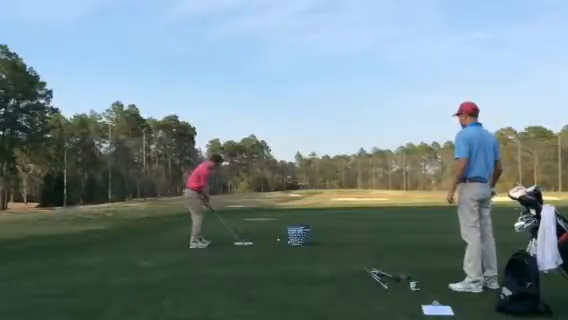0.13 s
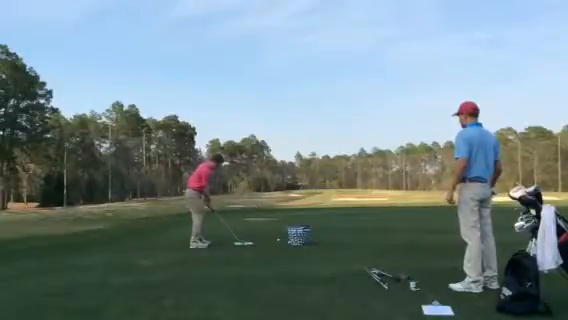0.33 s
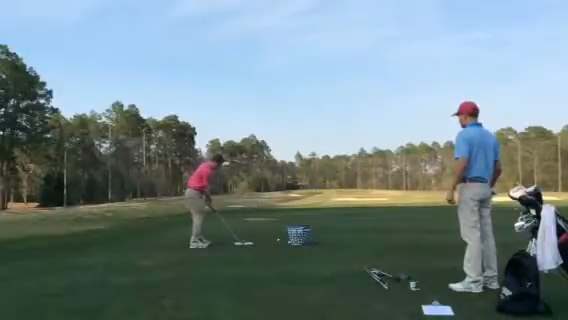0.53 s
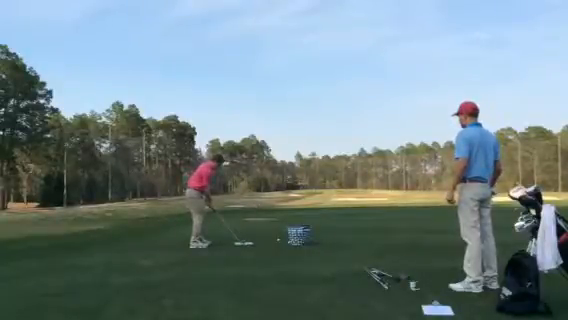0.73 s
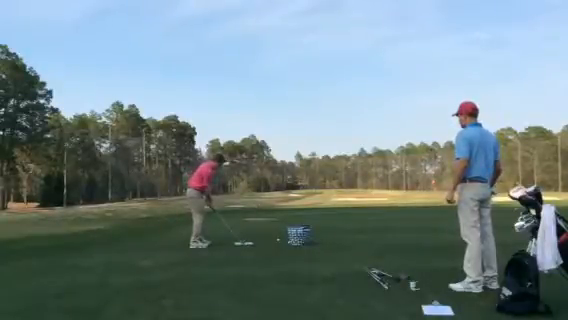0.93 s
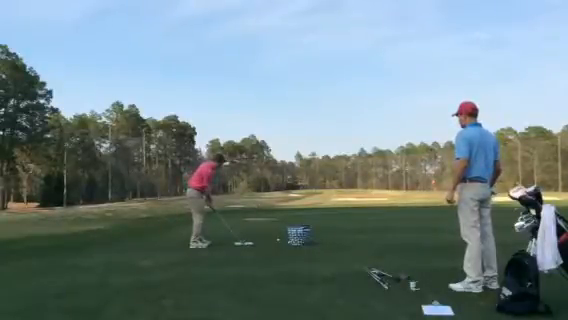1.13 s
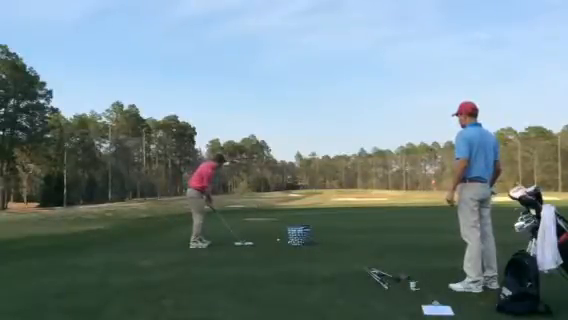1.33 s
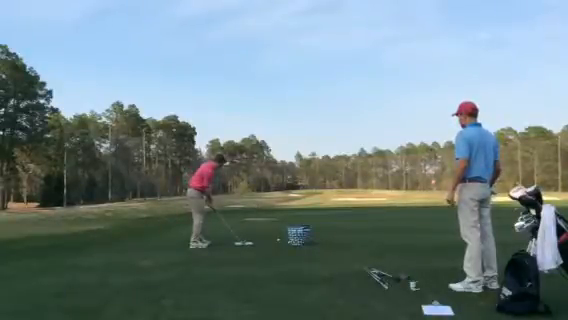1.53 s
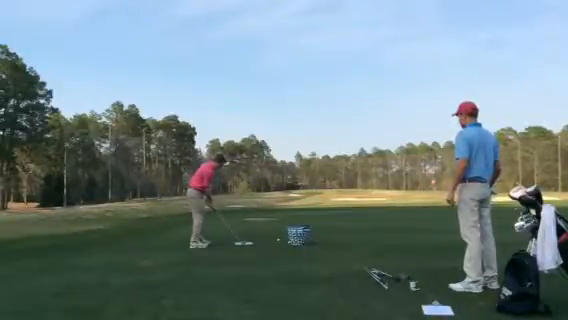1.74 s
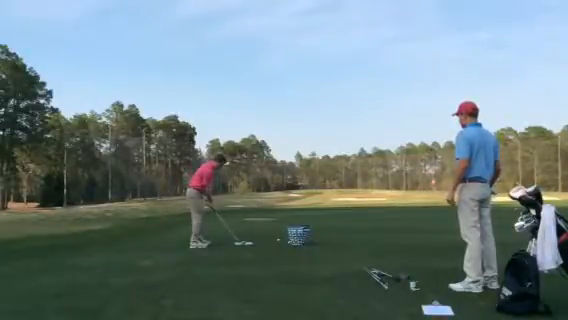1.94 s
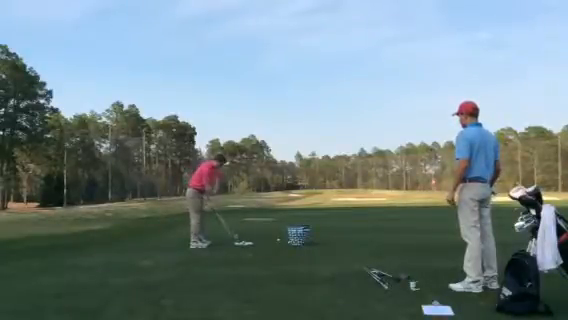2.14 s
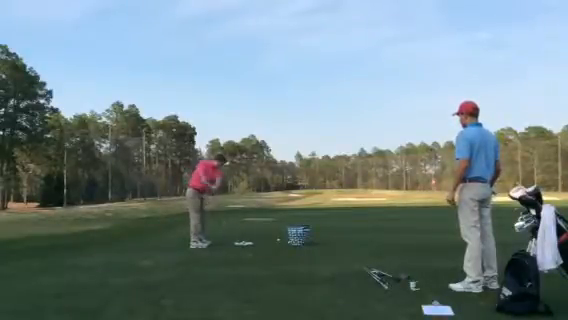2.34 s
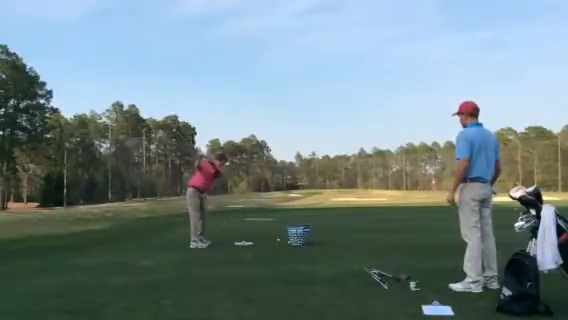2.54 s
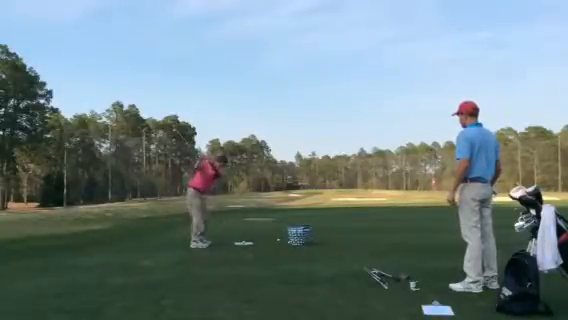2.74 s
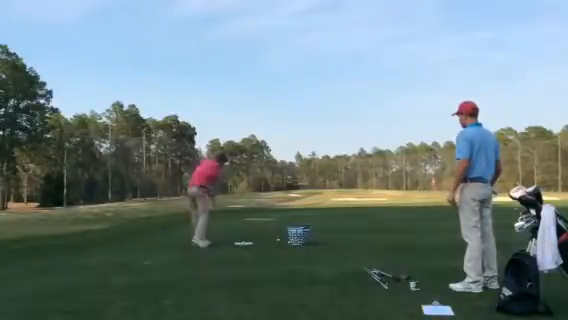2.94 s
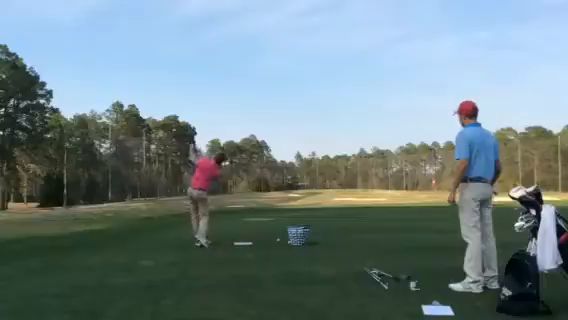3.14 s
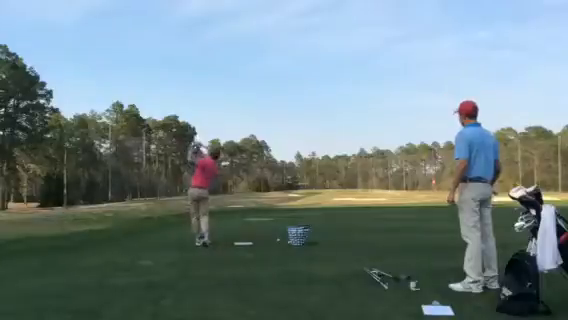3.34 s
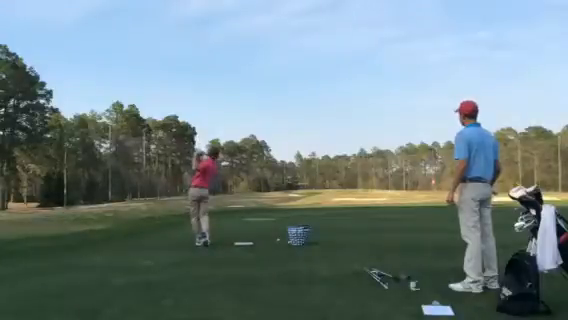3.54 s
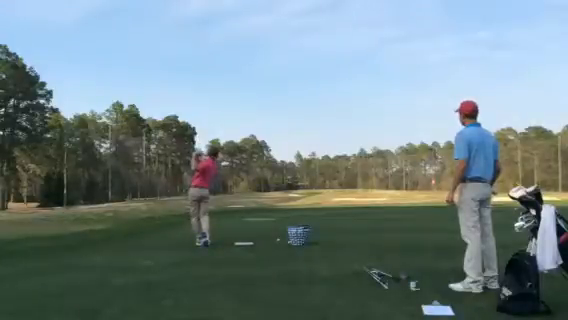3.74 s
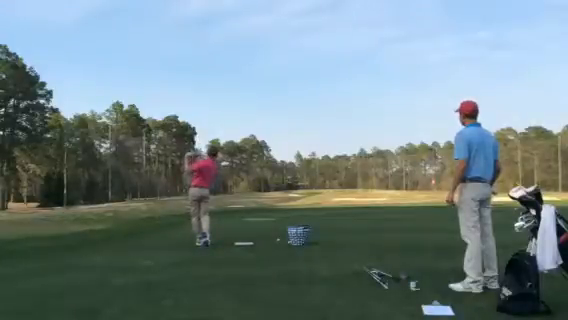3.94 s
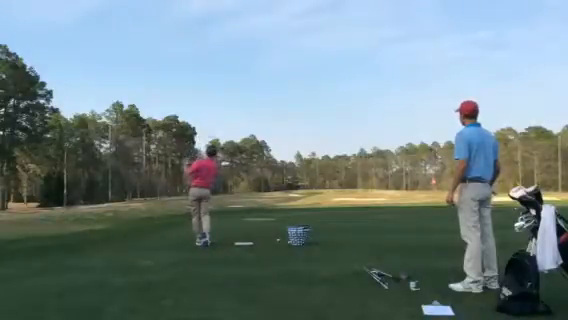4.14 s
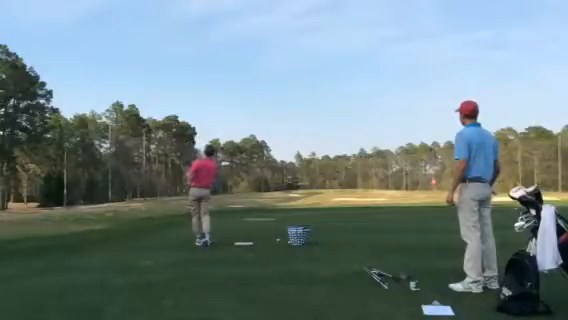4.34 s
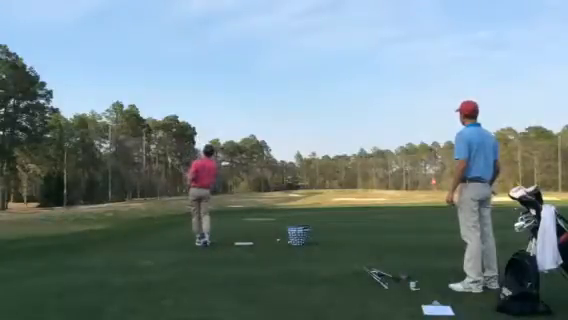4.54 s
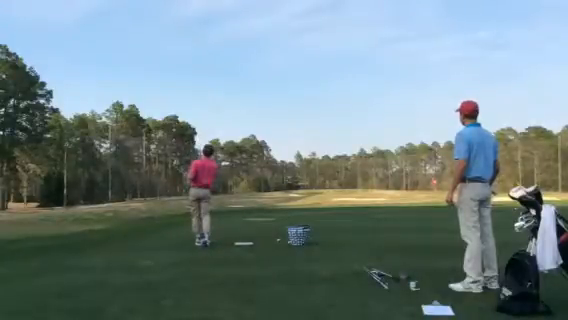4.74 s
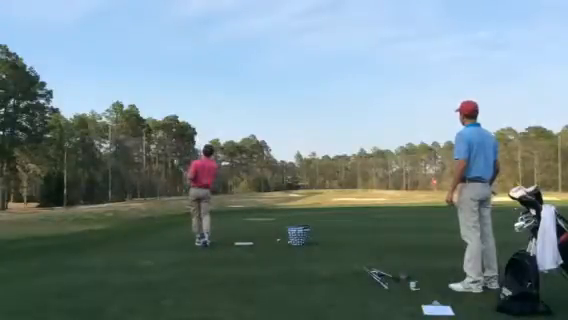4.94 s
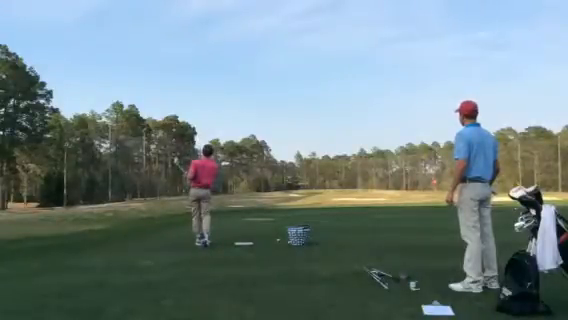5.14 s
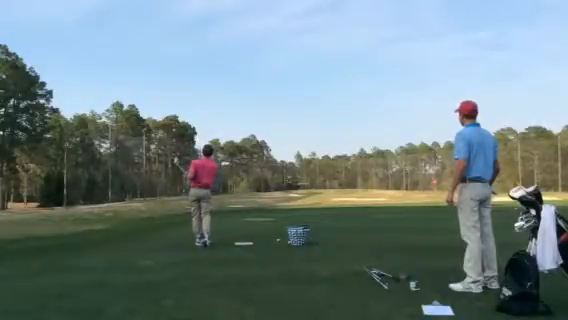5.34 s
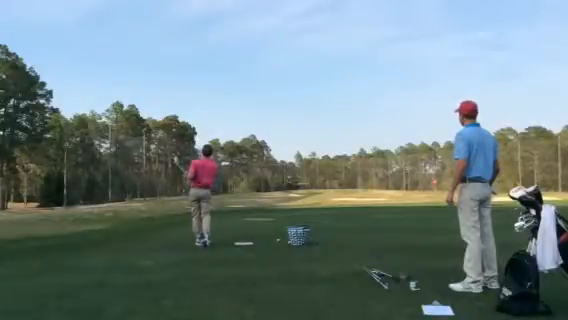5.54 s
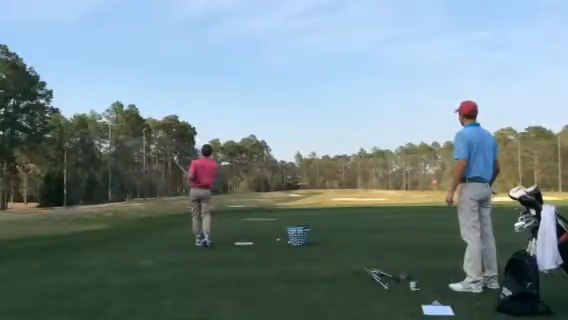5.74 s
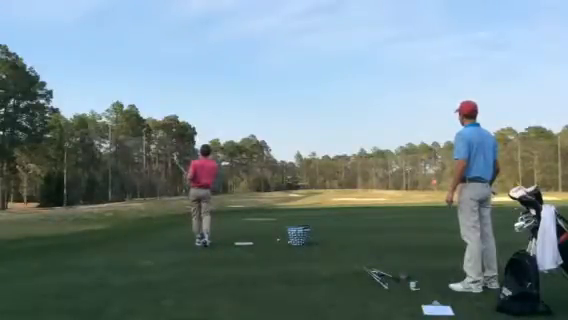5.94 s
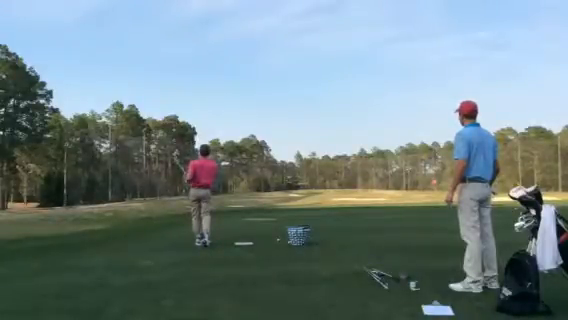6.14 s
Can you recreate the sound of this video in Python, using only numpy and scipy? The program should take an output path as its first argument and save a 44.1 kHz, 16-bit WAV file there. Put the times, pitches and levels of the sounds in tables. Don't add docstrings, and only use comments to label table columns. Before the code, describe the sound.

Faint breeze and distant traffic, a small tick nearby, then a hard metallic golf strike with brief ring and returning hiss, birds calling on.

```python
import sys
import numpy as np
from scipy import signal
from scipy.fft import rfft, irfft, next_fast_len
from scipy.io import wavfile
from scipy.ndimage import map_coordinates

SR = 44100
rng = np.random.default_rng(int(sys.argv[2]) if len(sys.argv) > 2 else 0)


def invert_db(x):
    u = np.asarray(x, float) / 20
    return 10 ** u


def wav_record(signal):
    frames = np.transpose(np.atleast_2d(signal))
    bounded = np.clip(frames, -1, 1)
    quanta = np.round(bounded * 32767).astype(np.int16)
    wavfile.write(sys.argv[1], SR, quanta)


N = 272538

# pitch_hz, density_db [dB per Hz]
BUFFET_SPECTRUM = [(12, -40.5), (20, -12), (76, 2.5), (149, -12.5), (239, -36), (264, -42), (400, -36),
                   (520, -65), (880, -120)]
# peak_s, peak_db, hold_s
GUSTS = [(0, -55.5, 0.044), (0.34, -55.5, .05), (0.394, -50.5, 0.034), (.52, -55, 0.021),
         (0.607, -59, 0.015), (.93, -60, 0.015), (1.196, -66.5, 0.018), (1.355, -62, 0.018),
         (1.55, -66.5, 0.13), (1.857, -65, .03), (2.4, -65.5, .03), (2.595, -70, .02), (2.7, -70, .02),
         (3.04, -60, 0.19), (4.0, -68.5, .1), (4.607, -61.5, 0.025), (4.954, -66, .01), (5.165, -65, .01),
         (5.32, -59, 0.02), (5.424, -59, .03), (5.49, -63.5, 0.023), (5.599, -56, .03), (5.767, -66, .03),
         (5.9, -53.5, .04), (5.97, -54.5, 0.049), (6.11, -56.5, .08)]
# time_s, level_db
TRAFFIC_LEVEL = [(0.0, -76), (0.91, -75), (2.72, -75), (2.98, -73), (3.11, -71), (3.6, -74), (3.94, -74.5),
                 (4.2, -75), (5.47, -75), (6.18, -74.5)]
# pitch_hz, density_db [dB per Hz]
TRAFFIC_SPECTRUM = [(59, -29.5), (100, -0.5), (192, -6), (242, -7), (295, -12), (360, -11), (415, -18),
                    (947, -15.5), (1990, -30), (2290, -28.5), (3000, -37), (3900, -68), (6600, -120)]
# pitch_hz, density_db [dB per Hz]
MIC_HISS_SPECTRUM = [(1500, -27), (2800, 0), (5000, -2.5), (7600, -6), (8200, -1.5), (11000, -3),
                     (14800, -5.5), (15300, -8), (15450, -60)]

# start_s, level_db, stretch [time factor]
WREN_PHRASES = [(2.540, -74, 1.03), (2.826, -72, 1), (3.114, -70.5, 1.02), (3.394, -67.5, 1.02),
                (3.677, -69, 1), (3.957, -69, 1.03)]
# after_start_s, length_s, first_hz, turning_hz, last_hz
WREN_SLURS = [
    (0, .013, 3700, 3138, 2555),
    (.033, .046, 2299, 1833, 2100),
    (.16, .026, 2400, 2644, 2800),
]
# after_start_s, length_s, first_hz, turning_hz, last_hz
WREN_HOOKS = [
    (.095, .057, 2850, 2412, 2478),
    (.198, .058, 3326, 2953, 2999),
]
# start_s, length_s, pitch_hz, level_db
FALLING_NOTES = [(.085, 0.034, 2910, -80), (.478, .044, 2840, -85), (4.666, 0.038, 2980, -84),
                 (5.053, .04, 2965, -80), (5.048, 0.018, 4600, -80), (5.432, 0.03, 3034, -76.5),
                 (5.83, .04, 2843, -78)]
RISING_NOTES = [(0, .053, 7740, -85), (.125, .036, 3650, -84), (.54, .017, 3870, -86),
                (2.245, 0.041, 2280, -86), (4.232, 0.0246, 3250, -76), (4.516, 0.015, 3056, -75),
                (5.03, .023, 3270, -78.5), (5.485, 0.029, 3590, -83), (5.875, .02, 3520, -79)]
HELD_NOTES = [(.688, 0.049, 2580, -90), (1.27, .067, 2290, -89), (1.718, .11, 2260, -93),
              (3.952, .045, 2340, -77), (4.475, 0.044, 2440, -79), (4.945, .012, 3600, -80),
              (5.249, .06, 2600, -85), (5.64, 0.045, 2620, -81), (5.852, .025, 4000, -86.5),
              (5.917, .025, 3540, -81.5)]
PLUNGING_NOTES = [(4.865, .012, 3300, -81), (4.936, .01, 3300, -77.5), (5.993, .021, 3020, -73.5)]
# pitch_hz, t60_s
TREE_DECAY = [(1000, .5), (4000, 0.85), (10000, 0.18)]

# start_s, level_db, pitch_hz, fall_s [time to drop 40 dB]
KNOCKS = [
    (.8975, -45, 4000, .005),
    (.898, -53, 2840, 0.0046),
    (.898, -59, 5550, .003),
    (.9, -51, 1200, 0.006),
    (.898, -52, 460, 0.026),
    (.9125, -57, 4140, 0.007),
    (5.9, -55, 3300, .006),
    (5.901, -58.5, 1970, 0.0073),
    (5.9, -53.5, 326, 0.035),
    (5.906, -58, 3700, 0.0052),
]
# start_s, length_s, level_db, lowest_hz, last_hz
CHIPS = [
    (1.789, 0.05, -72, 6750, 7200),
    (3.7076, .0155, -69, 6900, 9350),
    (4.647, .017, -69, 6450, 9500),
    (5.324, 0.017, -64.5, 7120, 9200),
    (5.942, .019, -70.5, 6900, 8300),
]
# start_s, length_s, level_db, lowest_hz, last_hz
SEEPS = [
    (4.595, 0.055, -82, 7050, 7700),
    (4.665, .011, -84, 6700, 8400),
    (5.961, .024, -74.5, 7040, 9000),
    (5.985, .015, -77.5, 7450, 7550),
]

# pitch_hz, density_db [dB per Hz]
TORN_SPECTRUM = [(150, -30), (300, 2), (1200, -2.5), (3000, -3), (5000, -14), (8500, -12.5), (11000, -21),
                 (14500, -25.5), (16000, -49.5)]
# pitch_hz, density_db [dB per Hz]
SCATTERED_SPECTRUM = [(600, -29.5), (1000, -7), (2700, 0.5), (4800, -7.5), (7500, -11), (8300, -9.5),
                      (10000, -11.5), (12500, -30), (15000, -60)]
# start_s, crack_db, crack_t60_s, thump_db
CONTACTS = [
    (2.9996, -40, .045, -44),
    (3.027, -11, 0.0068, -10.5),
    (3.0281, -9, 0.0076, -12),
    (3.030, -18, 0.02, -12.5),
    (3.0323, -21.5, .016, -17.5),
    (3.0345, -28, .016, -20.5),
    (3.066, -52, .025, -48.5),
    (3.085, -49.5, .025, -48.5),
    (3.105, -64, 0.02, -39),
    (3.3193, -63, 0.018, -57.5),
]
# pitch_hz, density_db [dB per Hz]
CRACK_SPECTRUM = [(710, -33.5), (1200, -4), (3250, -2.5), (3820, -13), (4510, -7.5), (5310, -12), (6750, 0),
                  (9900, -7), (12600, -21), (14700, -11), (16400, -42)]
# pitch_hz, density_db [dB per Hz]
THUD_SPECTRUM = [(90, -32), (150, 0.5), (400, 1.5), (1000, -4), (2500, -12), (4500, -20), (7000, -50.5)]
# pitch_hz, level_db, t60_s
SHAFT_MODES = [(196, -8, 0.29), (303, -3.5, 0.32), (396, -8.5, 0.29), (571, 3, 0.26), (683, -8, 0.23),
               (776.7, -8, 0.2), (839, -2, 0.12), (918.8, -7, 0.18), (1088, 1.5, 0.13), (1330, -14.5, 0.13)]
# pitch_hz, level_db, t60_s
HEAD_MODES = [(2020, -13, 0.091), (2154, -20, 0.1), (2680, -7, 0.027), (3431, -11.5, 0.068),
              (3400, -9.5, 0.053), (4140, -9, 0.04), (4654, -3, 0.031), (5512, -13, 0.046),
              (6700, 1.5, 0.023), (7700, -7.5, 0.021), (8050, -14, 0.018), (11955, -19, 0.025)]
# pitch_hz, level_db, t60_s
FACE_MODES = [
    (6600, -14.5, .012),
    (7500, -20, 0.0078),
    (14800, -24, .008),
]


def unit(x):
    return x / np.sqrt(np.mean(x ** 2) + 1e-20)


def along(points, hz):
    f, v = np.transpose(points)
    return np.interp(np.log(hz + 1), np.log(f + 1), v)


def wobble(rate):
    knots = rng.standard_normal(int(N * rate / SR) + 4)
    return map_coordinates(knots, [np.arange(N) * rate / SR])


def noise(spectrum, size=N):
    m = next_fast_len(size + 8192)
    gain = invert_db(along(spectrum, np.fft.rfftfreq(m, 1 / SR)))
    return unit(irfft(rfft(rng.standard_normal(m)) * gain, m)[:size])


def add(track, s, sound):
    part = track[round(s * SR):][:len(sound)]
    part += sound[:len(part)]


def swell(s, db, rise, hold_s, fall):
    t = np.arange(N) / SR - s
    return invert_db(db + rise * np.minimum(t, 0) - fall * np.maximum(t - hold_s, 0))


def background():
    strength = invert_db(-71.5 + 2 * wobble(14))
    for s, db, hold_s in GUSTS:
        strength += swell(s, db, rise=302, hold_s=hold_s, fall=302)
    buffeting = strength * unit(invert_db(2.2 * wobble(18)) * noise(BUFFET_SPECTRUM))
    time_s, level_db = np.transpose(TRAFFIC_LEVEL)
    traffic_db = np.interp(np.arange(N) / SR, time_s, level_db) + 7 + 0.64 * wobble(5.5)
    traffic = invert_db(traffic_db) * noise(TRAFFIC_SPECTRUM + [(4500, -70)])
    return buffeting + traffic + invert_db(-81.5) * noise(MIC_HISS_SPECTRUM)


def whistle(length, first_hz, middle_hz, last_hz, db):
    u = np.linspace(-1, 1, max(round(length * SR), 16))
    bend_hz = (first_hz + last_hz) / 2 - middle_hz
    hz = middle_hz + u * (last_hz - first_hz) / 2 + u * u * bend_hz
    envelope = np.sqrt(2) * invert_db(db) * (1 - u * u) ** 0.33
    return envelope * np.sin(2 * np.pi * np.cumsum(hz) / SR)


def dive(length, top_hz, low_hz, last_hz, dive_s, lead_s):
    t = np.arange(-lead_s, length, 1 / SR)
    crest_hz = (top_hz - low_hz) * np.exp(-(t / dive_s) ** 2)
    curl_hz = (last_hz - low_hz) * np.clip(t / length, 0, 1) ** 4
    hz = low_hz + crest_hz + curl_hz
    edges = np.clip(np.minimum(t + lead_s, length - t) / .002, 0, 1)
    return t, hz, np.sqrt(2) * edges * np.sin(2 * np.pi * np.cumsum(hz) / SR)


def wren():
    out = np.zeros(N)
    for start, phrase_db, stretch in WREN_PHRASES:
        for (s, *note), db in zip(WREN_SLURS, [-2, -5, -0.5]):
            add(out, start + stretch * s, whistle(*note, phrase_db + db + rng.normal(0, 1.5)))
        for (s, *note), db in zip(WREN_HOOKS, [-4.5, 1]):
            t, hz, tone = dive(*note, dive_s=0.0046, lead_s=0)
            level_db = phrase_db + db + rng.normal(0, 1) - 330 * np.abs(t - .011)
            add(out, start + stretch * s, invert_db(level_db) * tone)
    last_hook = dive(.045, 3250, 1930, 1950, dive_s=.009, lead_s=0)[2]
    add(out, 4.545, invert_db(-81) * last_hook)
    return out


def far_birds():
    out = wren()
    shapes = [(FALLING_NOTES, 1.08, 0.92), (RISING_NOTES, 0.98, 1.2), (HELD_NOTES, 1, 1.025),
              (PLUNGING_NOTES, 1.2, .86)]
    for notes, first, last in shapes:
        for s, length, hz, db in notes:
            add(out, s, whistle(length, first * hz, hz, last * hz, db))
    for k in range(7):
        start = 4.342 + k * .0115 + rng.normal(0, 0.00049)
        add(out, start, whistle(0.009, 3650, 3265, 3050, -75 + rng.normal(0, 0.85)))
    return out * invert_db(1.5 * wobble(90) + 1.2 * wobble(250))


def trees(x):
    hz, t, z = signal.stft(rng.standard_normal(SR // 2), SR, nperseg=256)
    decay = invert_db(-60 * t / along(TREE_DECAY, hz)[:, None])
    tail = signal.istft(z * decay, SR, nperseg=256)[1]
    late = np.pad(x, (300, 0))
    return signal.fftconvolve(late, tail / np.linalg.norm(tail))[:N]


def rustle():
    return swell(.89, -79, rise=120, hold_s=.03, fall=120) * invert_db(2.7 * wobble(150)) * noise(SCATTERED_SPECTRUM)


def knocks():
    out, t = np.zeros(N), np.arange(SR // 20) / SR
    for s, db, hz, t60 in KNOCKS:
        add(out, s, invert_db(db - 40 * t / t60) * np.sin(2 * np.pi * hz * t))
        add(out, s, invert_db(db - 21 - 60 * t / 0.012) * noise(CRACK_SPECTRUM, size=len(t)))
    return out


def chips():
    out = np.zeros(N)
    beak_hz, beak_wide_hz = 9100, 480
    for calls, top_hz, lead_s in [(CHIPS, 11000, .002), (SEEPS, 8200, .001)]:
        for s, length, db, low_hz, last_hz in calls:
            t, hz, tone = dive(length, top_hz, low_hz, last_hz, dive_s=.0047, lead_s=lead_s)
            beak_db = 11 * np.exp(-((hz - beak_hz) / beak_wide_hz) ** 2)
            crest_db = -13 * np.clip((hz - beak_hz) / 2000, 0, 1)
            add(out, s - lead_s, invert_db(db + beak_db + crest_db - 90 * t) * tone)
    return out * invert_db(1.6 * wobble(900))


def groove_whistle():
    phase = 2 * np.pi * np.cumsum(5780 * (1 + .022 * wobble(400))) / SR
    tones = np.sin(phase) + 0.72 * np.sin(1.4 * phase)
    strength = swell(3.001, -52, rise=9000, hold_s=.006, fall=1000)
    strength += swell(3.026, -56, rise=500, hold_s=0, fall=5000)
    strength += swell(3.14, -73.5, rise=500, hold_s=.11, fall=400)
    return strength * invert_db(2 * wobble(50) + 3.5 * wobble(500)) * tones


def swish():
    torn = swell(3.0, -52.5, rise=420, hold_s=.026, fall=2000) * noise(TORN_SPECTRUM)
    turf_back = swell(3.06, -59.5, rise=700, hold_s=.01, fall=170)
    trees_back = swell(3.235, -67.5, rise=80, hold_s=.07, fall=55)
    back = (turf_back + trees_back) * noise(SCATTERED_SPECTRUM)
    sing = groove_whistle()
    return invert_db(1.6 * wobble(90)) * (torn + back) + sing


def ring(modes, attack_s):
    t = np.arange(SR // 2) / SR
    out = np.zeros(len(t))
    for hz, db, t60 in modes:
        beating_db = 1.5 * wobble(30)[:len(t)]
        out += invert_db(db - 60 * t / t60 + beating_db) * np.sin(2 * np.pi * hz * t)
    return (1 - np.exp(-t / attack_s)) * out


def strike():
    out, t = np.zeros(N), np.arange(SR // 5) / SR
    treble_cut = signal.butter(4, 4500, fs=SR, output="sos")
    for s, crack_db, t60, thump_db in CONTACTS:
        burst = noise(CRACK_SPECTRUM, size=len(t))
        dull = signal.sosfilt(treble_cut, burst)
        bright = burst - dull
        add(out, s, invert_db(crack_db - 60 * t / t60) * dull + invert_db(crack_db - 130 * t / t60) * bright)
        add(out, s, -invert_db(thump_db - 60 * t / 0.0041) * np.sin(2 * np.pi * 650 * t))
    blow_s, leave_s = CONTACTS[1][0], CONTACTS[2][0]
    low_shaft_modes = [(142.25, -9, .35), (480, -12, .15)]
    add(out, blow_s, -invert_db(-30.5) * ring(SHAFT_MODES + low_shaft_modes, attack_s=.001))
    add(out, blow_s, invert_db(-21.5) * ring(HEAD_MODES, attack_s=.0002))
    add(out, leave_s - .0004, ring(FACE_MODES, attack_s=.0005))
    thud_gain = invert_db(-22 - 60 * t / 0.056) + invert_db(-35.5 - 60 * t / 0.2)
    add(out, blow_s, thud_gain * noise(THUD_SPECTRUM, size=len(t)))
    return signal.sosfilt(signal.butter(4, 110, "high", fs=SR, output="sos"), out)


def warbler():
    out = np.zeros(N)
    for k in range(26):
        db = -86.5 + 4.5 * k / 25 + rng.normal(0, 1.2)
        s = 3.754 + .04795 * k + .000133 * k * k
        add(out, s, whistle(.019, 3900, 4450, 5150, db))
    return out


def scene():
    club = strike() + swish()
    air = background() + knocks()
    far, near = far_birds(), chips() + warbler()
    echoes = trees(invert_db(-4.5) * far + invert_db(-16) * near) * wobble(420)
    return (club + air + far + near + echoes + rustle())[None]


def low_pass(x):
    return signal.sosfilt(signal.butter(12, 16520, fs=SR, output="sos"), x)


def record(dry):
    band = signal.butter(12, 16200, fs=SR, output="sos")
    return low_pass(signal.sosfilt(band, dry))


dry = scene()
out = record(dry)
wav_record(out)
```